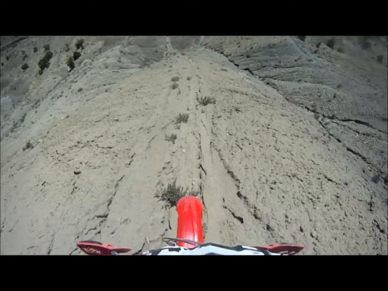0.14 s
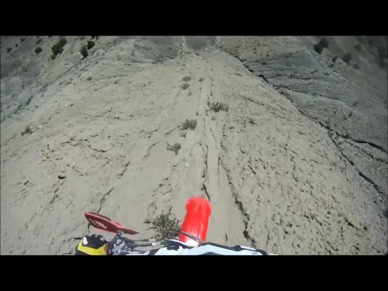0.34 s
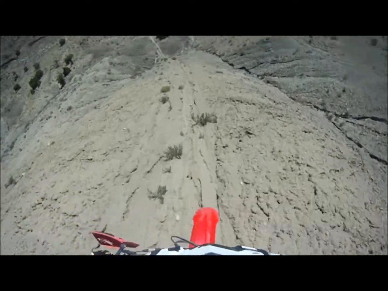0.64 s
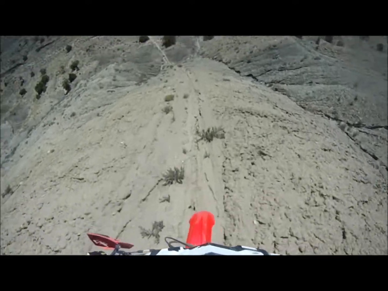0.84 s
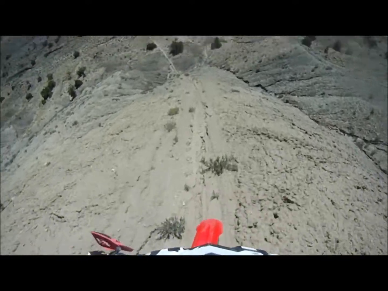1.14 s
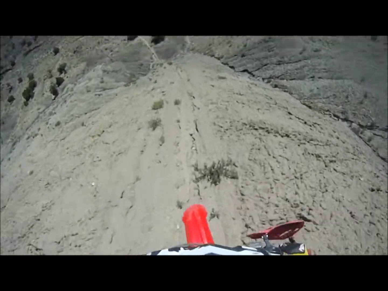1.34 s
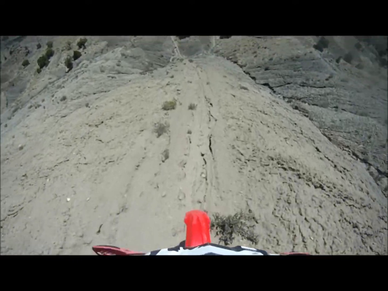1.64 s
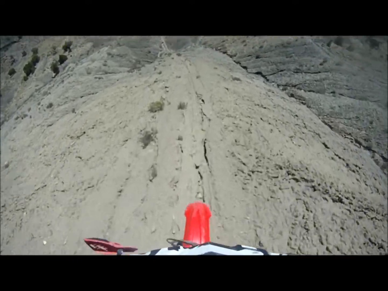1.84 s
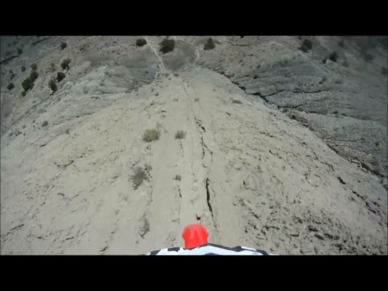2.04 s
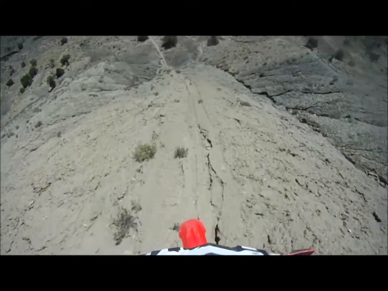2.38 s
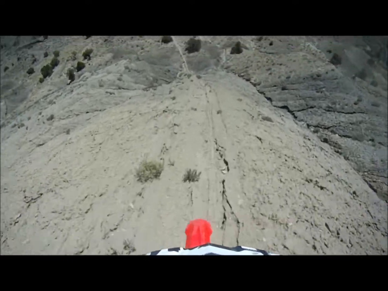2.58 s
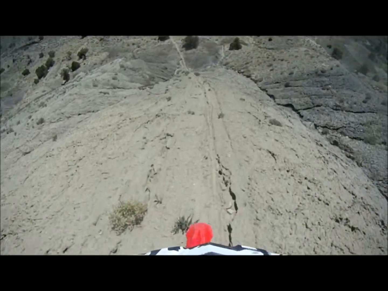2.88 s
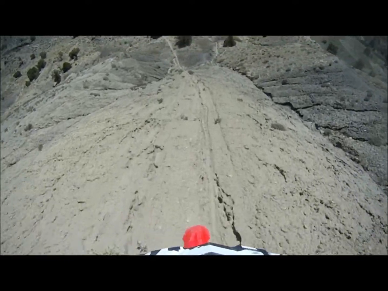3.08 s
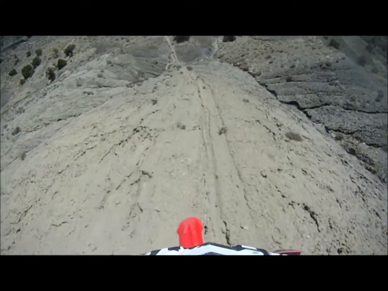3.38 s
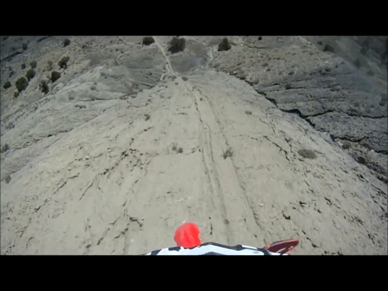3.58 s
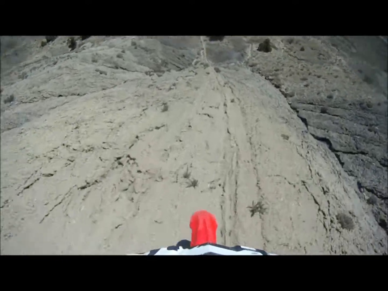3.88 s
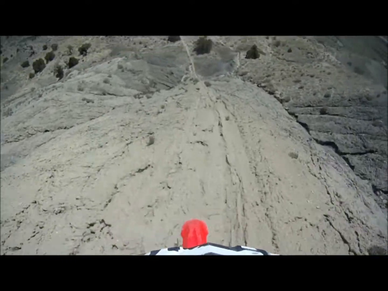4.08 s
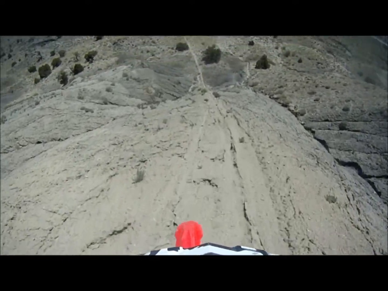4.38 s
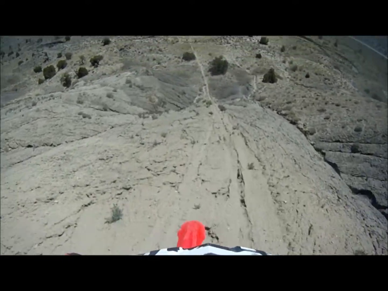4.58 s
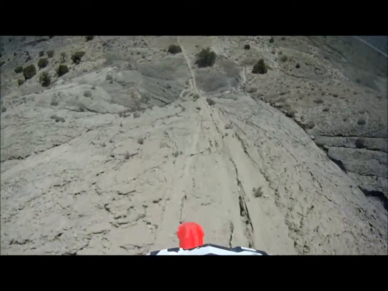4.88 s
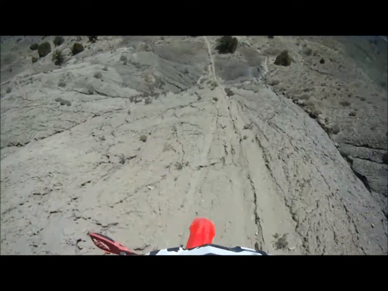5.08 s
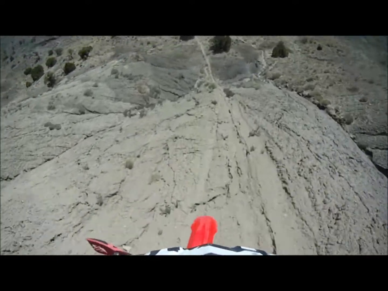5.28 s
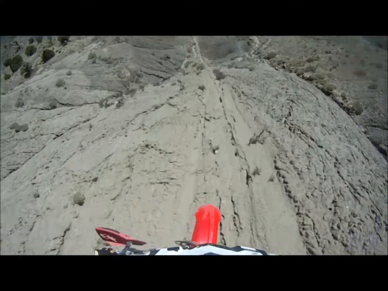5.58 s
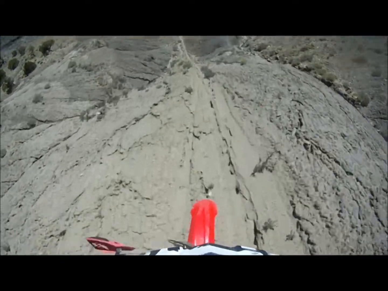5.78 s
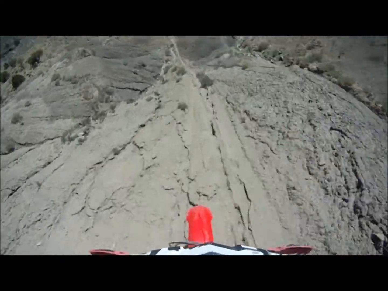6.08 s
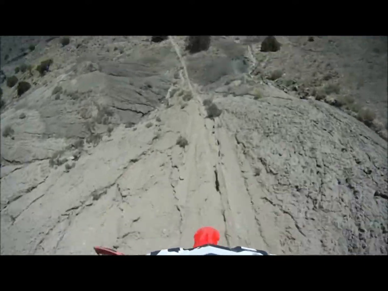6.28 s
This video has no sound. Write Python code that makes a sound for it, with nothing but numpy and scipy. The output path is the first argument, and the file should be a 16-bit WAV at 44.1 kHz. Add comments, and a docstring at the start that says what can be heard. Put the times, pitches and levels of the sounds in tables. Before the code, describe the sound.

A dirt bike rolls downhill at a low, thumping idle, with sharp plastic knocks, small ticks and tyres scrubbing over rutted clay.

```python
"""Bare, rutted clay slope: a single-cylinder four-stroke dirt bike rolls down at idle, heard from a
helmet camera in a plastic case. Firings thump the exhaust, valves chatter, a dragging brake sings.
Tyres scrub over grit and ruts shake the helmet. Bumps knock the case against its mount; loose parts
tick. The camera overloads on the hardest knocks, and its coarse sampling adds a fizzy top."""
import sys
import numpy as np
from scipy import signal
from scipy.fft import rfft, irfft
from scipy.io import wavfile
from scipy.ndimage import uniform_filter1d

SR = 44100
rng = np.random.default_rng(int(sys.argv[2]) if len(sys.argv) > 2 else 0)


def persist_wave(psi):
    """Save psi, clipped to +-1, as 16-bit WAV."""
    counts = np.round(np.clip(psi, -1, 1) * 32767).astype(np.int16)
    wavfile.write(sys.argv[1], SR, np.atleast_2d(counts).T)


N = 283563
TIME_S = np.arange(N) / SR

# idle speed (time [s], firing rate [Hz])
FIRING_RATE = [(0.0, 24.79), (0.5, 27.22), (1.39, 24.84), (1.86, 26.22), (2.31, 25.47), (2.95, 25.8),
               (3.38, 28.32), (3.73, 25.02), (4.16, 27.78), (4.69, 24.65), (5.07, 26.16), (5.54, 26.98),
               (5.99, 25.05), (6.26, 26.46), (6.43, 25.01)]
# exhaust pipe (frequency [Hz], width [Hz], gain [dB])
PIPE_MODES = [(125, 46, -29), (158, 30.6, 2), (211, 64, -2.5), (288.9, 32.6, 0), (427, 130, -1.5)]
# engine cases and cylinder head (frequency [Hz], width [Hz], gain [dB])
ENGINE_MODES = [(661, 42, -7), (726, 75, -5), (1020, 210, -11.5), (1118, 86, -7.5), (1347, 75, -3.5),
                (1953, 110, 0.5), (2068.6, 126, 1.5)]
# the engine's metallic ring shifts between its two highest notes (time [s], shift to upper [dB])
RING_BALANCE = [(0, -4.5), (1.2, -7), (2.1, -4), (2.6, 0), (3.4, 3), (4.2, 4.5), (5.0, 9), (6.43, -6)]
# chain and gears (frequency [Hz], relative density [dB])
WHIRR_SPECTRUM = [(300, -32), (1500, -35), (2400, -22), (2800, 8), (3700, 7.5), (4400, 0.5), (5400, 0.5),
                  (6000, -2)]
# engine clatter (time [s], relative level [dB])
CLATTER_LEVEL = [(0, -47.5), (1.0, -47.5), (1.4, -51), (2.1, -47.5), (4.4, -48.5), (4.72, -45.5),
                 (5.1, -50.5), (5.55, -46.5), (6.43, -51.5)]
# dragging brake (time [s], level [dB])
BRAKE_LEVEL = [(0, -56), (2.3, -53.5), (2.8, -51), (3.0, -48.5), (3.35, -45.5), (3.7, -51), (4.1, -46.5),
               (4.6, -51.5), (6.43, -50.5)]
# tyres on clay (frequency [Hz], relative density [dB])
SCRUB_SPECTRUM = [(100, 16.5), (400, -5.5), (720, 12.5), (1100, 4.5), (1600, 1), (2100, 2.5), (2600, 3),
                  (3500, -4), (4500, -10.5), (5400, -18), (6000, -10)]
# tyres gripping and sliding (time [s], relative level [dB])
SCRUB_LEVEL = [(0, -52.5), (.5, -60), (1.15, -58.5), (1.7, -52.5), (2.3, -63), (3.1, -58), (4.2, -56),
               (4.65, -48), (5.22, -50), (5.55, -48), (6.0, -50), (6.43, -51.5)]
# helmet shake (frequency [Hz], relative density [dB])
SHAKE_SPECTRUM = [(10, -33), (22, -7.5), (31, 10), (38, -4), (50, -14), (70, -29), (110, -30), (170, -28),
                  (400, -57.5)]
# ruts (start [s], length [s], shake level [dB])
RUT_SHAKES = [(0, 0.063, -30.5), (.25, .14, -31.5), (0.662, .11, -28.5), (1.04, .04, -33),
              (1.25, 0.1, -34.5), (1.687, .12, -30), (1.87, 0.089, -35.5), (2.225, 0.092, -31),
              (2.406, 0.085, -27.5), (2.776, 0.028, -31.5), (3.606, 0.22, -36.5), (3.822, 0.074, -24),
              (3.956, 0.05, -28.5), (4.272, 0.029, -27.5), (4.415, .17, -32.5), (4.68, .13, -30),
              (4.826, .13, -36.5), (5.074, .09, -28), (5.247, .04, -36), (5.537, 0.066, -32),
              (6.078, 0.17, -26.5), (6.303, 0.14, -36.5)]
# camera case (frequency [Hz], width [Hz], gain [dB])
CASE_MODES = [(630, 44, -1), (684, 31, -6), (771, 78, 4), (950, 144, 3.5), (1100, 120, 4),
              (1450, 130, -1.5), (1893, 65, 4), (2143, 155, 7), (2770, 120, -10.5), (2956, 130, 0),
              (3440, 200, 0), (4800, 630, -17)]
# knocks on the case (time [s], strength [dB], favoured ring [Hz], its lift [dB], tilt [dB/octave],
# helmet thud [dB], first touch re blow [dB], rebound re blow [dB])
CASE_KNOCKS = [(.0715, -36, 620, 6, -10, -29, -9, -18), (.169, -34, 1080, 4, 0, -45, -20, -16),
               (.2450, -23.5, 966, 48, 11, -25, -11, -23), (.6695, -21, 760, 18, -1.5, -18.5, 2, -3),
               (1.2550, -30, 686, 20, 3.5, -31, -18, -16), (1.3535, -26.5, 730, 15, 0, -25.5, -14, -7.5),
               (1.5884, -6.5, 2250, 7.5, 11.5, -34.5, -29, -33),
               (1.7410, -32.5, 1110, 24, 8.5, -47, -10, -8), (2.1477, -14, 716, 10, -2.5, -32, -24, -24),
               (2.4135, -18, 743, 22, -4.5, -22, -7, -9), (2.6041, -22, 2120, 2.5, 6.5, -32, -30, -26),
               (3.6232, -21, 702, 8, -3, -37, -25, -24), (3.89, -12.5, 707, 12, -0.5, -30, -37, -32),
               (3.9494, -5.5, 2130, 3.5, 10, -28.5, -14, -31),
               (4.254, -33.5, 670, 15, -25, -31.5, -16, -12), (4.6360, -33, 1110, 22, 5, -50, -15, -9),
               (4.7858, -10.5, 690, 0, -3.5, -22, -23, -11), (6.1612, -1, 985, 14, -3, -13.5, -10, -22.5)]
# loose parts and flung grit (time [s], relative level [dB])
TICK_EVENTS = [(0.167, -49), (0.195, -38.5), (0.4693, -47), (0.557, -40), (1.317, -44.5), (1.7404, -48),
               (2.5486, -48), (2.6895, -47), (3.4328, -40.5), (3.7413, -38.5), (4.041, -41.5),
               (4.133, -43.5), (5.139, -44), (5.215, -37), (5.303, -42.5), (5.688, -40), (6.2714, -35),
               (6.303, -41.5), (6.345, -40), (6.4002, -34)]
# one tick (frequency [Hz], relative density [dB])
TICK_SPECTRUM = [(800, -22), (2200, -12), (3000, 10), (4500, 6.5), (5400, 13), (6000, 2)]


def undb(db):
    """Decibels to gain."""
    return 10 ** (np.asarray(db) / 20)


def unit(x):
    """Scale to rms 1."""
    return x / np.sqrt(np.mean(x ** 2))


def curve(table):
    """Interpolate (time [s], value) rows per sample."""
    return np.interp(TIME_S, *np.transpose(table))


def colour(x, spectrum):
    """Filter by (frequency [Hz], gain [dB]) rows; rms 1."""
    hz, db = np.transpose(spectrum)
    bins_hz = np.maximum(np.fft.rfftfreq(len(x), 1 / SR), 1)
    gain = undb(np.interp(np.log(bins_hz), np.log(hz), db))
    return unit(irfft(rfft(x) * gain, len(x)))


def drift(rate_hz):
    """Smooth random curve, rms 1."""
    size = int(SR / rate_hz)
    steps = np.repeat(rng.standard_normal(N // size + 1), size)
    return unit(uniform_filter1d(steps, size)[:N])


def ring(modes, length_s):
    """Impulse response of damped modes (frequency [Hz], width [Hz], gain [dB])."""
    t = np.arange(int(length_s * SR)) / SR
    return sum(undb(db) * np.sqrt(width_hz) * np.exp(-np.pi * width_hz * t) * np.sin(2 * np.pi * hz * t)
               for hz, width_hz, db in modes)


def through(x, response):
    """Convolve, keeping the length."""
    return signal.fftconvolve(x, response)[:len(x)]


def lowpass(x, hz, order):
    return signal.sosfilt(signal.butter(order, hz, fs=SR, output="sos"), x)


def highpass(x, hz, order):
    return signal.sosfilt(signal.butter(order, hz, "high", fs=SR, output="sos"), x)


def add(track, at_s, sound):
    """Mix a sound into the track."""
    start = max(int(at_s * SR), 0)
    track[start:start + len(sound)] += sound[:max(N - start, 0)]


def blows(cycles, scatter_db, jitter_s):
    """One uneven impulse per whole cycle."""
    at = np.flatnonzero(np.diff(np.floor(cycles)))
    timing, strength = rng.standard_normal((len(at), 2)).T
    at += (timing * jitter_s * SR).astype(int)
    out = np.zeros(N)
    out[np.clip(at, 0, N - 1)] = undb(scatter_db * strength)
    return out


def impacts(rate_hz, spread_db):
    """Tiny random impacts, rms 1."""
    sizes = undb(spread_db * np.minimum(rng.exponential(size=N), 4))
    hits = rng.random(N) < rate_hz / SR
    return unit(hits * sizes * rng.standard_normal(N))


def exhaust(cycles):
    """Each firing thumps the pipe and releases a fading puff of turbulent gas."""
    firings = unit(blows(cycles, scatter_db=1.43, jitter_s=0.00013))
    puff = unit(np.exp(-(cycles % 1) / 1.05) * rng.standard_normal(N))
    pipe = through(undb(-12) * puff - firings, ring(PIPE_MODES, length_s=.12))
    # silencer: an inner echo cancels one band; deep swing and sharp edge are blocked
    notch_hz = 375
    pipe = signal.lfilter(*signal.iirnotch(notch_hz, Q=4, fs=SR), pipe)
    pipe = highpass(pipe, hz=118, order=3)
    return undb(-43.5) * unit(lowpass(pipe, hz=471, order=6))


def engine_clatter(cycles):
    """Valves and piston tap the metal twice a cycle; the cam chain rattles, the gears whirr."""
    taps = unit(blows(2 * cycles + 0.1519, scatter_db=-2.0, jitter_s=0.001475))
    chain = impacts(rate_hz=3000, spread_db=1.0) * (1 + 0.24 * np.cos(2 * np.pi * (cycles + 0.14)))
    teeth = rng.standard_normal(SR // 26)  # wear pattern, repeats each cycle
    gears = teeth[((cycles % 1) * len(teeth)).astype(int)]
    drive = unit(chain + 0.2 * taps + .5 * gears)
    modes = []
    for hz, width_hz, db in ENGINE_MODES:
        # two passes keep the valleys between modes dark
        broad = through(drive, ring([(hz, 2.08 * width_hz, 0)], length_s=0.018))
        narrow = through(broad, ring([(hz, width_hz, 0)], length_s=.06))
        flicker_db = 0.71 * drift(rate_hz=5.22) + 1.17 * drift(rate_hz=23.99)
        modes.append(unit(narrow) * undb(db + flicker_db))
    balance_db = curve(RING_BALANCE)
    metal = sum(modes[:-2]) + modes[-2] * undb(-balance_db / 2) + modes[-1] * undb(balance_db / 2)
    whirr = undb(-14.5) * colour(drive, WHIRR_SPECTRUM)
    return (unit(metal) + whirr) * undb(curve(CLATTER_LEVEL) + 4.5)


def brake():
    """Drag rings two disc modes: a wavering, broken note."""
    disc = ring([(1003, 63, -1.5), (1106, 24, -7.5)], length_s=.2)
    note = through(rng.standard_normal(N), disc)
    return unit(lowpass(note, hz=1300, order=4)) * undb(curve(BRAKE_LEVEL))


def tyres():
    """Knobs scrub dry clay and crush loose grit."""
    scrub = colour(impacts(rate_hz=3500, spread_db=0), SCRUB_SPECTRUM)
    flicker_db = 1.4 * drift(rate_hz=35)
    return scrub * undb(curve(SCRUB_LEVEL) + flicker_db + 6.5)


def helmet_shake(attack_s=0.015, release_s=0.037):
    """Each rut drives the helmet's low resonance: it builds, holds, dies away."""
    between_ruts_db = -43 + 1.5 * drift(rate_hz=6.3)
    power = undb(between_ruts_db) ** 2
    for start_s, length_s, db in RUT_SHAKES:
        attack = np.clip((TIME_S - start_s) / attack_s, 0, 1)
        release = np.exp(-np.maximum(TIME_S - start_s - length_s, 0) / release_s)
        power += (undb(db) * attack * release) ** 2
    shake = colour(rng.standard_normal(N), SHAKE_SPECTRUM)
    # flatten the noise envelope so the ruts set the swing
    running_rms = np.sqrt(np.abs(uniform_filter1d(shake ** 2, size=SR // 16)) + 0.0088)
    return shake / running_rms * np.sqrt(power)


def case_strike(ring_hz, lift_db, tilt_db_oct):
    """One chattering contact; where and how hard it lands weights the case modes."""
    hz, width_hz, db = np.transpose(CASE_MODES)
    favour_db = lift_db * np.exp(-(np.log2(hz / ring_hz) / 0.096) ** 2)
    treble_db = tilt_db_oct * np.log2(np.maximum(hz / 900, 1))
    body = ring(zip(hz, width_hz, db + favour_db + treble_db), length_s=.05)
    # a harder, brighter contact moves the whole case less
    body = highpass(body, hz=np.clip(546 + 12 * tilt_db_oct, 450, 800), order=4)
    t = np.arange(SR // 20) / SR
    contact = .035 * rng.standard_normal(len(t)) * np.exp(-t / .003)
    contact[0] += 1  # the blow, ahead of its chatter
    knock = through(contact, body)
    return knock / np.sqrt(np.sum(knock ** 2) / (0.0026 * SR))  # energy of 2.6 ms at rms 1


def case_knocks(touch_lead_s=0.00314, rebound_lag_s=.0118, thud_hz=107):
    """The case hits its loose mount: dull first touch, blow with helmet thud, rebound."""
    out = np.zeros(N)
    t = np.arange(SR // 20) / SR
    thud = np.sin(2 * np.pi * thud_hz * t) * np.exp(-t / 0.012) * (1 - np.exp(-t / 0.0024))
    for at_s, db, ring_hz, lift_db, tilt_db_oct, thud_db, touch_db, rebound_db in CASE_KNOCKS:
        touch = undb(db + touch_db) * case_strike(ring_hz, lift_db, tilt_db_oct - 12)
        blow = undb(db) * case_strike(ring_hz, lift_db, tilt_db_oct)
        rebound = undb(db + rebound_db) * case_strike(ring_hz, lift_db, tilt_db_oct - 2)
        add(out, at_s - touch_lead_s, touch)
        add(out, at_s, blow + undb(thud_db) * thud)
        add(out, at_s + rebound_lag_s, rebound)
    return lowpass(out + 1e-18, hz=5210, order=6)


def ticks(attack_s=0.00089, decay_s=0.0044):
    """Loose parts and flung grit: dry, scratchy bursts, plus nine faint ones at random."""
    out = np.zeros(N)
    t = np.arange(SR // 25) / SR
    envelope = np.exp(-t / decay_s) * (1 - np.exp(-t / attack_s))
    faint = [(rng.uniform(0, N / SR), rng.uniform(-57, -49)) for _ in range(9)]
    for at_s, db in TICK_EVENTS + faint:
        burst = colour(rng.standard_normal(len(t)), TICK_SPECTRUM) * envelope
        add(out, at_s, undb(db + 7.5) * burst)
    return out


def scene():
    """Engine, wheels and bumps at the helmet, mono."""
    cycles = .61 + np.cumsum(curve(FIRING_RATE)) / SR
    engine = exhaust(cycles) + engine_clatter(cycles)
    return (engine + brake() + tyres() + helmet_shake() + case_knocks() + ticks())[None]


def record(dry):
    """The microphone clips; coarse sample-and-hold mirrors the sound into the treble."""
    sample_hz, hold_hz, cutoff_hz = 12000, 48000, 15300
    clipped = lowpass(np.clip(dry, -.93, .93), hz=5390, order=8)
    coarse = signal.resample_poly(clipped, sample_hz, SR, axis=1)
    held = np.repeat(coarse, hold_hz // sample_hz, axis=1)
    fizzy = signal.resample_poly(held, SR, hold_hz, axis=1)[:, :N]
    return signal.sosfilt(signal.ellip(10, .2, 70, cutoff_hz, fs=SR, output="sos"), fizzy)


dry = scene()
out = record(dry)
persist_wave(out)
```